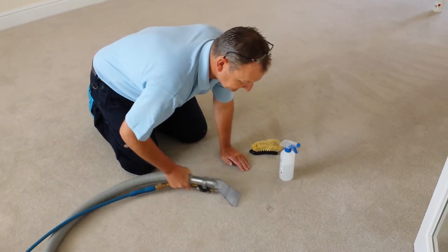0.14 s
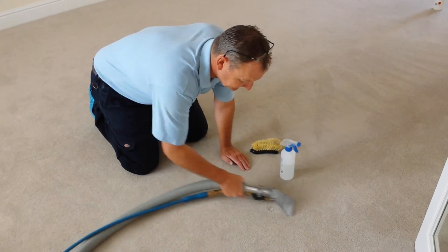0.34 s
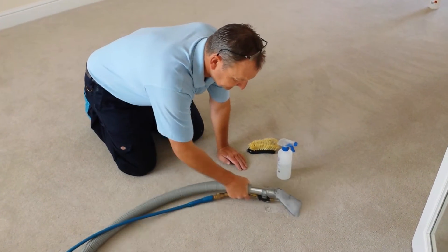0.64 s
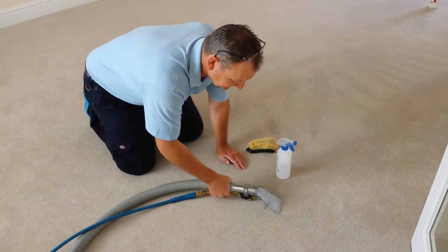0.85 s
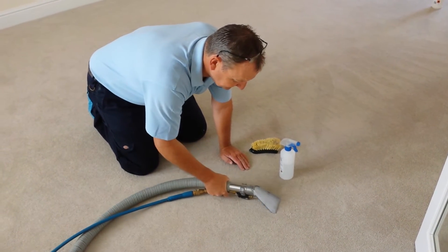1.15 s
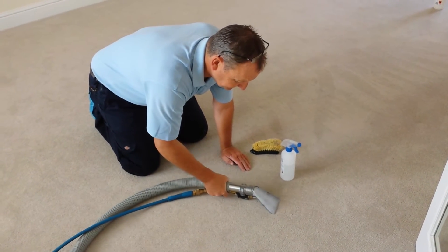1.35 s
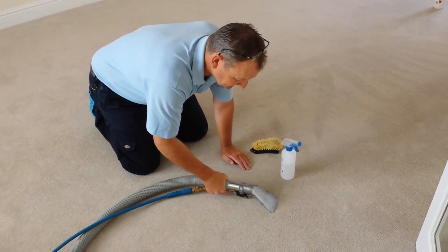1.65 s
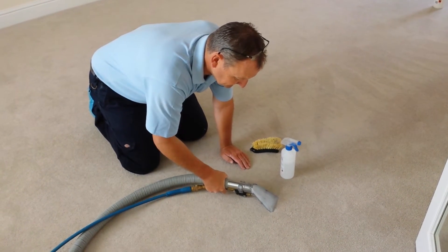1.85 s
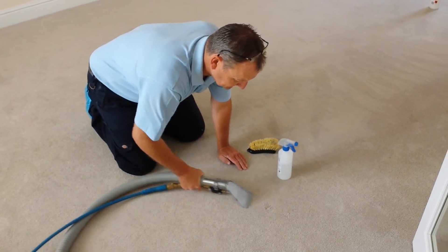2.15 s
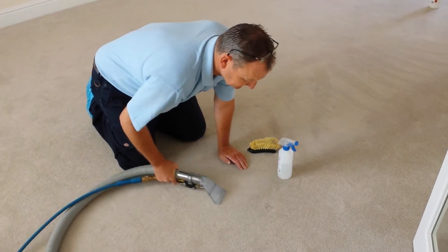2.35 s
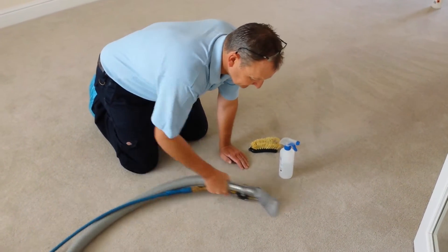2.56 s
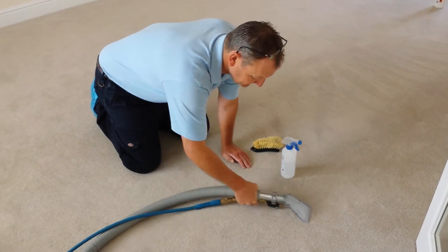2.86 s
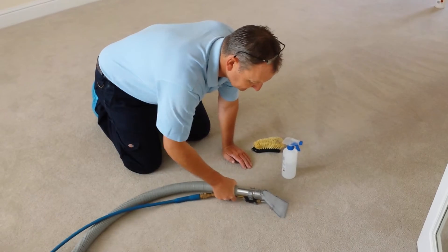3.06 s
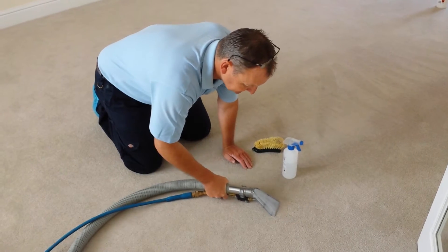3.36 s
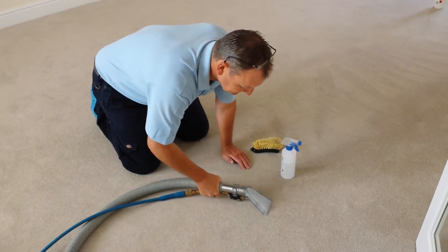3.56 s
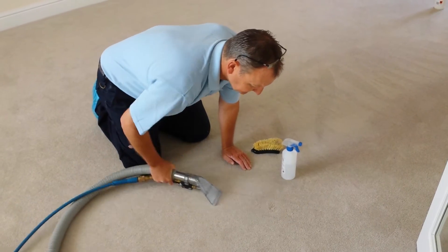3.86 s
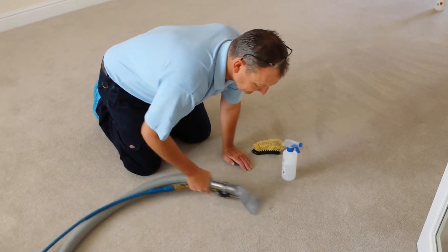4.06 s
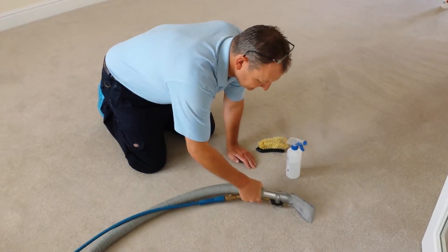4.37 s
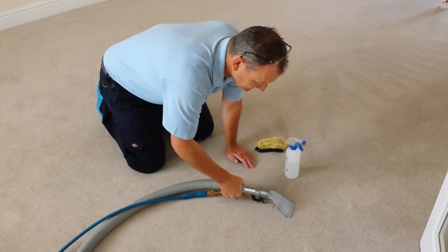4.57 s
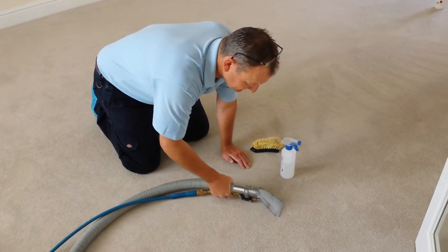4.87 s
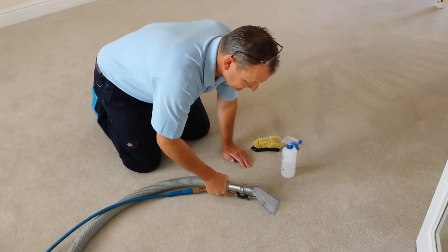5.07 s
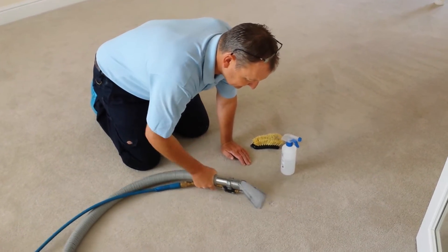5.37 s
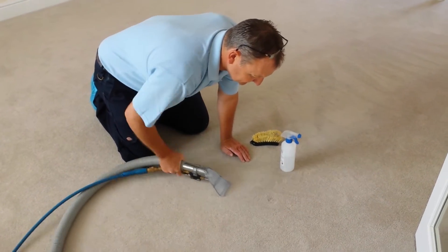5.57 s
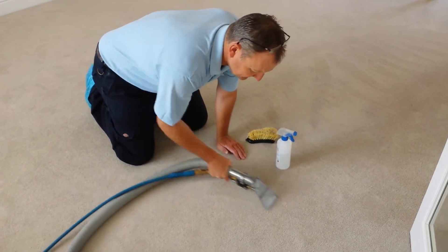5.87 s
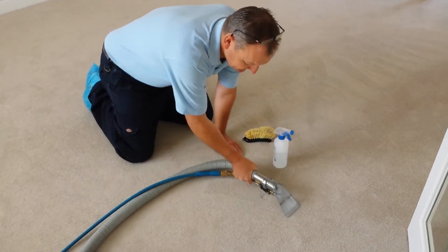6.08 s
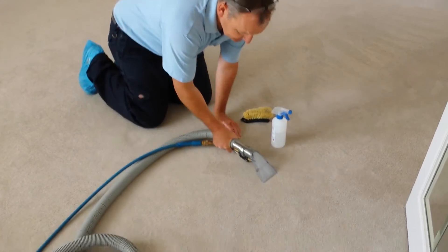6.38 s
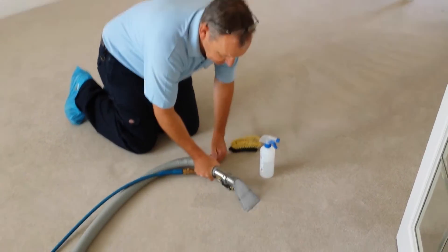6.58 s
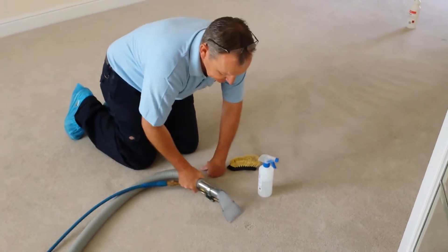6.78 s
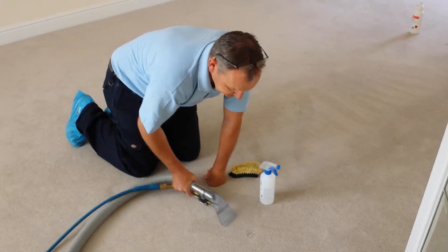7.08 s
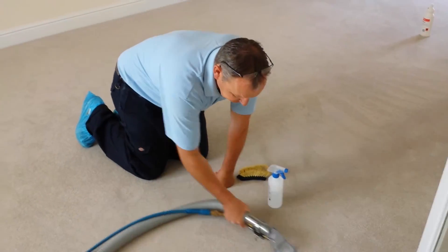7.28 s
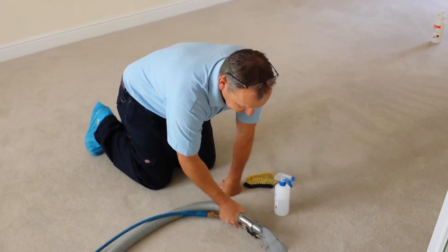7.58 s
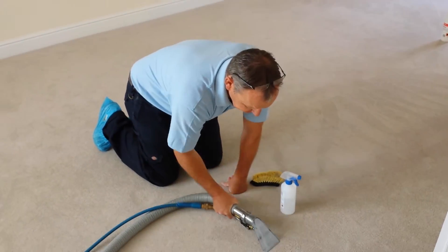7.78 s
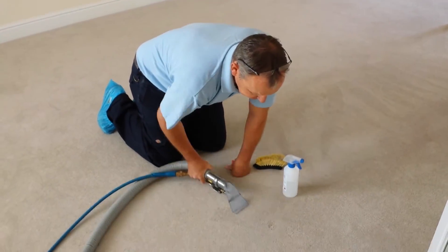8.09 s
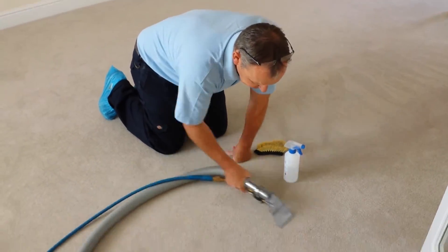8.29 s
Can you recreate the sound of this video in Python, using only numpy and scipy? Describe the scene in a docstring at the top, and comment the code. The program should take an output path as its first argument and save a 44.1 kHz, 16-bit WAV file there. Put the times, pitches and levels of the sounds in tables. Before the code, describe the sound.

A carpet cleaning machine runs indoors, its vacuum singing one strong note over hissing air, a low hose roar and a faint pump hum. As the hand tool is pulled over wet carpet, the note rises slightly, then dips and flutters at each turn, with breathy whistles and tiny gulps of water. A hand over the nearby microphone muffles the right side, most heavily late on, when it adds a low rumble.

```python
"""The vacuum turbine of a carpet cleaner sings one strong note as its hand tool is drawn over wet carpet.
The note rises when the tool seals against the carpet and flutters at each turn of the stroke.
Air hisses at the tool's slot and roars in the hose, while a water pump hums in the room.
A hand shifts over the right microphone opening, muffling that side and adding a low rumble."""
import sys
import numpy as np
from scipy import signal
from scipy.fft import rfft, irfft
from scipy.io import wavfile
from scipy.ndimage import map_coordinates

SR = 44100
rng = np.random.default_rng(int(sys.argv[2]) if len(sys.argv) > 2 else 0)


def pcm_store(signal):
    """Save signal as 16-bit PCM."""
    levels = np.round(np.clip(np.atleast_2d(signal), -1, 1) * 32767)
    wavfile.write(sys.argv[1], SR, levels.astype(np.int16).T)


N = 372204
T = np.arange(N) / SR
BINS_HZ = np.fft.rfftfreq(N, 1 / SR)

# Turns of the stroke, where the seal breaks. Each row: time it seals again in seconds, half length in
# seconds, extra flutter from 0 to 1, speed-up left in Hz, change of the note in dB (minus is a dip).
STROKE_TURNS = [(0.435, 0.06, 0, 0.56, 2), (2.686, 0.076, 0.22, 3.64, 0.5), (4.217, 0.12, 0.24, 1.02, 0),
                (5.993, 0.11, 0.1, 1.5, -1), (7.281, 0.15, 0.15, 0.93, -4.5), (8.366, 0.084, 0.1, 1, -2.5)]
LEAK_LEAD_S = 0.028  # the leak is widest this long before the tool seals again
# Gulps of water that choke the hose. Each row: time in seconds, half length in seconds, share of note lost.
WATER_GULPS = [(0.394, 0.0062, 0.8), (0.423, .006, 0.84), (0.473, 0.022, .28), (2.613, 0.009, 0.52),
               (2.647, .006, 0.2), (2.671, 0.0069, 0.48), (2.738, 0.01, .27), (2.774, 0.0078, 0.34),
               (4.214, 0.0036, 0.5), (5.936, .012, 0.4), (5.98, 0.01, 0.35), (7.199, 0.0052, .35),
               (7.24, .02, .15), (7.274, 0.007, 0.4), (8.283, 0.023, 0.35), (8.336, .009, 0.4),
               (8.43, .02, 0.6)]

def turbine(free_hz=352, vacuum_lag_s=0.053, flutter_hz=65, second_ratio=1.0678, second_db=-24):
    """The spinning shaft sings a note and its octave; a faint second turbine beats against them."""
    rise = speed_up()
    hz = free_hz + rise
    vacuum = np.interp(T - vacuum_lag_s, T, rise)  # suction in the tank trails the shaft
    tank_ring_db = 2.5 * bell(vacuum, centre=6.96, half=2.08)  # louder where the tank rings along
    note_db = -17.5 + 2 * seal(vacuum) + tank_ring_db
    note_db += sum(reseal(dip, s) for s, *_, dip in STROKE_TURNS)
    octave_db = -47.5 + 16 * seal(rise) ** 1.27
    shaft = angle(hz)
    # broken airflow shakes both the strength and the timing of the wave
    depth = 0.048 + sum(extra * bell(T, s, half) for s, half, extra, *_ in STROKE_TURNS)
    flutter = 1 + depth * (wander(flutter_hz) + 1j * wander(flutter_hz)) / np.sqrt(2)
    passage = np.prod([1 - lost * bell(T, s, half) for s, half, lost in WATER_GULPS], axis=0)
    note = undb(note_db) * np.exp(1j * shaft)
    octave = undb(octave_db + 1.4 * wander(7.2)) * np.exp(2j * shaft)
    second = undb(note_db + second_db) * np.sin(angle(hz * second_ratio))
    return np.sqrt(2) * (passage * np.imag((note + octave) * flutter) + second)


# Pulls of the tool, which glides and then presses down. Each row: start of the press in seconds,
# end in seconds, speed-up while gliding in Hz, top speed-up in Hz.
TOOL_PULLS = [(.96, 2.282, 2.88, 10), (3.204, 3.798, 4.6, 6.4), (4.719, 5.6, 4.1, 7.4),
              (6.482, 6.99, 3.06, 6.56), (7.803, 8.17, 3, 4.4)]

def speed_up(start_hz=1.46, recover_s=0.2135, flattening=1.48):
    """Extra shaft speed in Hz: pressing the tool down unloads the turbine, and each turn slows it."""
    points = [(0.006, start_hz)] + [(s - LEAK_LEAD_S, rise) for s, _, _, rise, _ in STROKE_TURNS]
    along = np.linspace(0, 1, num=8)
    for (turn, *_), (start, end, glide, top) in zip(STROKE_TURNS, TOOL_PULLS):
        points.append((turn + recover_s, glide))
        climb = top - (top - glide) * (1 - along) ** flattening
        points += zip(start + (end - start) * along, climb)
    return curves(sorted(points))[0]


def seal(rise, sealed_hz=8.45):
    """How tightly the tool sits on the carpet, from 0 to 1, for a given speed-up."""
    return np.sin(np.pi / 2 * np.clip(rise / sealed_hz, 0, 1)) ** 2


def reseal(dip_db, s, dip_s=0.057, snap_s=0.0015, overshoot_s=0.0086, swell_db=1.5, swell_s=0.37):
    """The note's change in dB as the tool seals again: it dips or lifts, snaps back too far, and swells."""
    sealed = (1 + np.tanh((T - s) / snap_s)) / 2
    away = abs(T - s)
    dip = dip_db * np.exp(-away / dip_s)
    overshoot = -1.1 * dip_db * np.exp(-away / overshoot_s)
    swell = swell_db * np.exp(-away / swell_s)
    return (1 - sealed) * dip + sealed * (overshoot + swell)


# Spray and air at the slot. Each row: pitch in Hz, base level in dB per Hz.
SLOT_HISS = [(40, -80), (250, -67.5), (600, -59.5), (950, -58), (1150, -59), (1800, -59), (2200, -57.5),
             (2750, -58), (3400, -59), (4900, -60), (5800, -57.5), (7200, -67), (8700, -72), (9700, -84.5),
             (11200, -86), (14500, -103)]
# Pitches where the tool's tube rings, and one hollow. Each row: pitch in Hz, half width in Hz, lift in dB.
TUBE_RINGS = [(510, 16, 6.5), (595, 31, 0.5), (800, 26, 3), (1055, 23, 4.5), (1306, 38, 2.5), (1460, 18, 4),
              (1600, 19, 0.5), (2100, 35, 4), (2766, 61, 2.5), (4560, 240, -0.9)]
# Breathy whistles as the slot tilts on the carpet. Each row: time in seconds, half length in seconds,
# pitch in Hz, half width in Hz, lift in dB, slide in Hz per second.
SLOT_WHISTLES = [(0.377, 0.15, 2480, 260, 5.5, 0), (1.4, 0.4, 2820, 130, 3.5, 0),
                 (1.92, 0.24, 2860, 120, 6, -3), (2.26, 0.19, 2730, 135, 6, -400),
                 (2.527, 0.085, 4010, 270, 7.5, 1.5), (2.72, .17, 3950, 350, 4.5, 0),
                 (2.7, 0.33, 2550, 330, 3, 0), (4.004, 0.098, 3910, 210, 8.6, 0),
                 (4.208, 0.19, 4130, 380, 6, 0), (4.11, 0.34, 2720, 260, 4, 0),
                 (4.303, .2, 6100, 755, 1.6, 0), (4.795, 0.054, 2820, 150, 3, -1),
                 (5.79, 0.24, 2450, 220, 5, -250), (5.895, .045, 2480, 200, 3, 0),
                 (6.8, .1, 3900, 450, 1.5, 2), (7.46, .05, 4245, 140, 4, -2200),
                 (7.573, 0.046, 3870, 170, 7, 0), (7.76, 0.34, 2700, 260, 4.2, 0),
                 (7.42, 0.14, 5550, 550, 3.5, 0), (8.0, .25, 5550, 450, 3.5, 0),
                 (7.87, .12, 3950, 300, 3, 0), (8.09, .07, 4080, 260, 3.5, 0), (8.38, .13, 5620, 700, 4, 0),
                 (8.38, 0.11, 2750, 280, 2.5, 0)]
# Brighter hiss when the tool is held steeper. Each row: time in seconds, lift in dB.
TILT_BRIGHTNESS = [(5.7, 1), (6.3, 4.5), (6.55, 4), (6.85, 3), (7.08, -0.5), (7.18, -1.5), (7.27, 1),
                   (7.38, 0.5), (7.58, 3.5), (8.08, 1.5), (8.44, -2)]
# Air rushes in as the slot's lip lifts. Each row: time in seconds, half length in seconds, lift in dB.
AIR_RUSHES = [(3.0, .22, 1.5), (7.447, 0.078, 4)]
# Short echoes off body, floor and door. Each entry: delay in milliseconds.
ECHO_DELAYS_MS = [1.3, 2.4, 3.6, 5.1, 7]

def slot(spatter_db=0.32, tuft_db=0.5, ripple_db=0.55, drift_ms=0.13, across_ms=0.22):
    """Wet air tears through the slot and rings the tube; some arrives straight, the rest via the room."""
    level_db = -1 - 0.93 * seal(speed_up())
    tufts = [(hz, wander(9)) for hz in np.geomspace(1000, 8000, num=8)]
    tube = ringing(TUBE_RINGS)
    echo_lags = [(ms + drift_ms * wander(1)) / 1000 for ms in ECHO_DELAYS_MS]  # drift as the tool moves

    def colour_db(hz, s):
        whistles = sum(lift * bell(s, at, half) * bell(hz, centre + slide * (s - at), width)
                       for at, half, centre, width, lift, slide in SLOT_WHISTLES)
        bright = curves(TILT_BRIGHTNESS, s)[0] * bell(hz, centre=4320, half=990)
        rush_db = sum(lift * bell(s, at, half) for at, half, lift in AIR_RUSHES)
        rush = rush_db * bell(hz, centre=10000, half=3300)
        ripple = sum(np.cos(2 * np.pi * hz * np.interp(s, T, lag)) for lag in echo_lags)
        # tufts passing under the slot nudge each part of the hiss on its own
        patches = sum(np.interp(s, T, nudge) * bell(hz, centre, 0.36 * centre) for centre, nudge in tufts)
        return whistles + bright + rush + ripple_db * ripple + tuft_db * patches

    straight = rfft(noise(SLOT_HISS))
    straight_share = 0.26 / (1 + (BINS_HZ / 4500) ** 4)  # the room takes over in the treble
    sides = []
    for lag_ms in (0, across_ms):  # the straight sound reaches the right side later
        delay = np.exp(-2j * np.pi * BINS_HZ * lag_ms / 1000)
        room = rfft(noise(SLOT_HISS))
        heard = np.sqrt(straight_share) * straight * delay + np.sqrt(1 - straight_share) * room
        sides.append(moving_filter(irfft(heard * tube, N), colour_db))
    return np.array(sides) * undb(level_db + spatter_db * wander(40))


# Air in the hose and tank. Each row: pitch in Hz, base level in dB per Hz.
HOSE_ROAR = [(20, -90), (50, -72.5), (88, -66.5), (102, -56), (120, -62), (140, -54), (185, -52),
             (225, -55), (285, -51), (330, -53.5), (400, -55.5), (500, -62.5), (900, -62.5), (4000, -105)]
# Pitches where hose and room ring or sound hollow. Each row: pitch in Hz, half width in Hz, lift in dB.
HOSE_RINGS = [(109, 5.6, 6.5), (187, 5.4, 4), (206, 11, -3), (239, 6, 1.5), (287, 7.4, 0.5), (314, 11, -4),
              (469, 7.4, -0.5), (453, 7.1, 3.5), (554, 12, -4.5), (650, 9, 1), (707, 12, -5), (930, 7.9, 6)]

def hose(burble_db=1.3, surge_db=0.97, room_db=-15):
    """Swirling air rings the hose with a low roar that swells when the seal breaks."""
    leak = sum(bell(T, s - LEAK_LEAD_S, half) for s, half, *_ in STROKE_TURNS)
    air = noise(HOSE_ROAR)
    room = undb(room_db) * noise(HOSE_ROAR) * np.array([[1], [-1]])  # left and right differ a little
    roar = irfft(rfft(air + room) * ringing(HOSE_RINGS), N)
    return roar * undb(burble_db * leak + surge_db * wander(6.3))


# Tones of the mains power, pump and housing. Each row: pitch in Hz, level in dB, pitch wobble in Hz,
# how much louder the left side is in dB.
HUM_TONES = [(99.85, -37.5, 0.73, 0.5), (133.9, -41, 1.97, 1.5), (148.8, -38.5, 0.94, -1.5),
             (201, -34, 0.653, -2.5), (528.4, -46.5, 2.37, -5), (825, -47.5, 3.69, -7), (946, -43, 1.9, -4),
             (972, -50, 1.6, 11), (2280, -42.5, 6.14, 2)]

def pump(waver_db=1.5):
    """The mains power and the water pump hum, each tone a little unsteady."""
    hum = 0
    for hz, db, wobble_hz, pan_db in HUM_TONES:
        tone = np.sin(angle(hz + wobble_hz * wander(6))) * undb(db + waver_db * wander(4))
        hum = hum + np.sqrt(2) * tone * undb(np.array([[pan_db], [-pan_db]]) / 2)
    return hum


# A hand covers the right microphone opening. Each row: time in seconds, base treble loss in dB.
HAND_COVER = [(0.0, 13), (0.16, 16.5), (3.17, 12), (4.84, 10.5), (4.94, 14), (5.71, 13.5), (6.09, 25.5),
              (6.49, 11.5), (6.58, 36), (6.72, 34), (6.86, 25), (7.01, 29), (7.14, 24.5), (7.21, 8),
              (7.52, 3.5), (7.76, 7), (7.97, 3), (8.44, 1.5)]
# That opening's own tone. Each row: pitch in Hz, lift in dB, how strongly the treble loss counts there.
OPENING_TONE = [(400, 0, 0), (950, -0.5, 0.12), (1400, -3.5, 0.15), (2200, -2, 0.51), (2800, -0.5, 0.68),
                (4100, 4, 0.97), (4900, 1.5, 1.1), (5800, -0.5, 1.22), (7300, 4, 1.1), (8540, 4.5, 0.95),
                (10100, 13.5, 0.86), (11300, 12.5, 0.7), (13200, 15.5, 0.42)]

def hand_over_microphone(sound, shut_db=31, detour_ms_per_db=0.011, rub_db=-2, touch_db=9):
    """The hand dulls the sound, makes it take a longer way round, and rumbles against the case."""
    cover_db, = curves(HAND_COVER)
    # the bass loses little until the opening is almost shut
    bass_loss_db = 0.066 * cover_db + 10.5 * np.minimum(cover_db / shut_db, 1) ** 8.2

    def shadow_db(hz, s):
        bass_db, treble_db = np.interp(s, T, bass_loss_db), np.interp(s, T, cover_db)
        lift_db, weight = spectra(OPENING_TONE, hz)
        return lift_db - bass_db - weight * (treble_db - bass_db)

    dulled = moving_filter(sound, shadow_db)
    detour_s = detour_ms_per_db * cover_db / 1000
    delayed = map_coordinates(dulled, [(T - detour_s) * SR], order=3, mode="nearest")
    rub = noise([(20, -62), (55, -56), (90, -43.5), (200, -67), (1000, -120)])
    pressure = np.clip(bass_loss_db / touch_db, 0, 1) ** 2
    return delayed + rub * undb(rub_db) * pressure


def undb(db):
    """Turn decibels into a number to multiply by."""
    return 10 ** (np.asarray(db) / 20)


def curves(table, at=T):
    """Join the rows of a time table with straight lines."""
    s, *columns = np.transpose(table)
    return [np.interp(at, s, column) for column in columns]


def spectra(table, at):
    """Join the rows of a pitch table, giving each octave equal room."""
    hz, *columns = np.transpose(table)
    return [np.interp(np.log(at + 1), np.log(hz), column) for column in columns]


def noise(table):
    """Noise shaped by rows of pitch in Hz and level in dB per Hz."""
    db, = spectra(table, BINS_HZ)
    return irfft(rfft(rng.standard_normal(N)) * undb(db), N) * np.sqrt(SR / 2)


def ringing(table):
    """How much a ringing pipe strengthens or weakens each pitch."""
    return undb(sum(lift * bell(BINS_HZ, centre, width) for centre, width, lift in table))


def wander(rate_hz):
    """A smooth random wobble of about size 1, not much faster than rate_hz."""
    steps = rng.standard_normal(int(2 * rate_hz * N / SR) + 2)
    smooth = signal.resample_poly(steps, up=8, down=1)
    return np.interp(T * 2 * rate_hz * 8, np.arange(len(smooth)), smooth)


def bell(x, centre, half):
    """A smooth hump of height 1."""
    return np.exp(-((x - centre) / half) ** 2)


def angle(hz):
    """The growing angle of something that turns hz times a second."""
    return 2 * np.pi * (np.cumsum(hz) / SR + rng.random())


def moving_filter(sound, gain_db):
    """Turn each pitch up or down over time by gain_db(pitches, times)."""
    hz, s, frames = signal.stft(sound, SR, nperseg=1024)
    return signal.istft(frames * undb(gain_db(hz[:, None], s)), SR, nperseg=1024)[1][:N]


def scene():
    """The whole machine in stereo, with the hand over the right side."""
    left, right = turbine() + hose() + pump() + slot()
    return np.array([left, hand_over_microphone(right)])


def record(dry, top_hz=14550):
    """Cut away the highest treble."""
    return signal.sosfilt(signal.ellip(10, 0.1, 80, top_hz, fs=SR, output="sos"), dry)


dry = scene()
out = record(dry)
pcm_store(out)
```